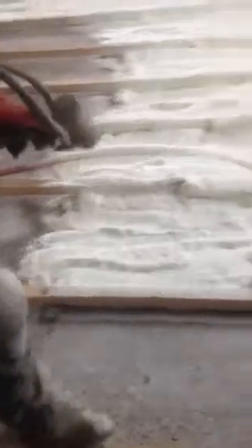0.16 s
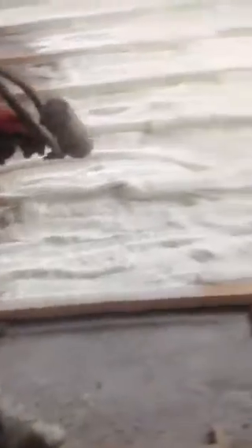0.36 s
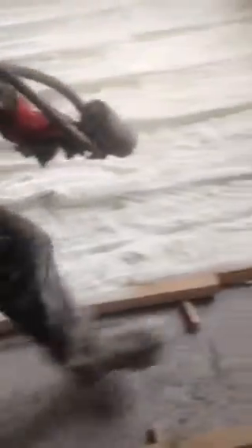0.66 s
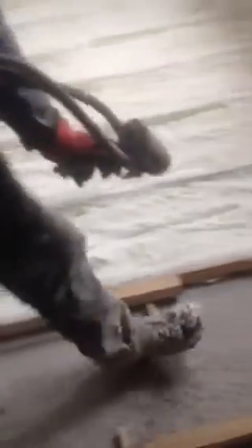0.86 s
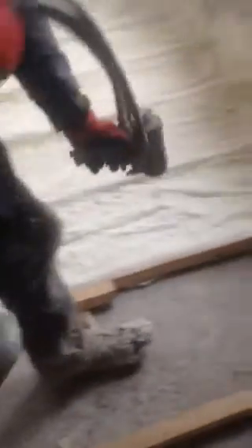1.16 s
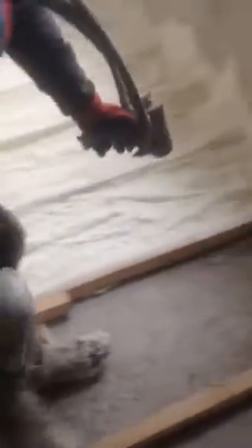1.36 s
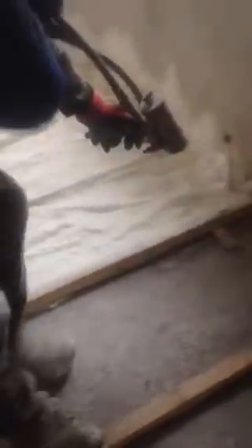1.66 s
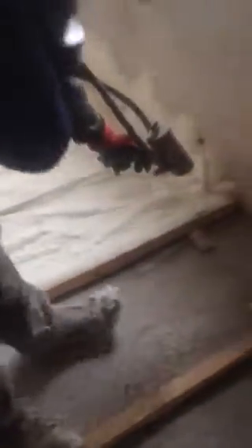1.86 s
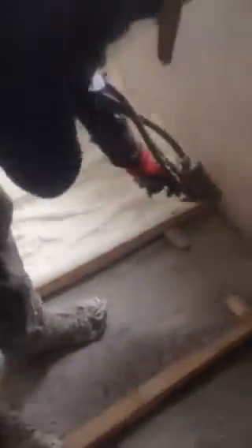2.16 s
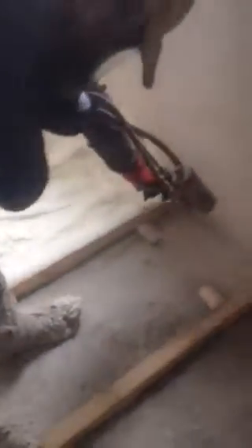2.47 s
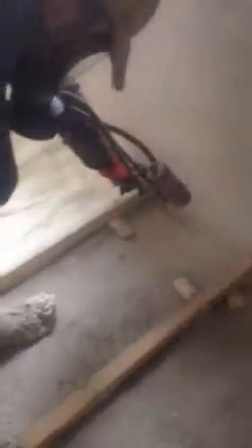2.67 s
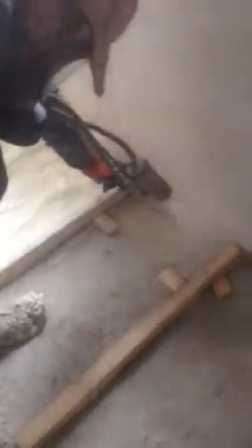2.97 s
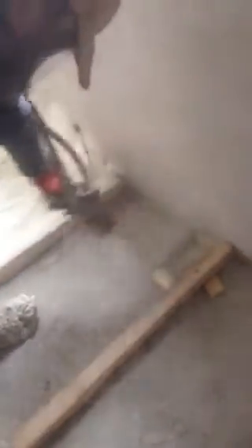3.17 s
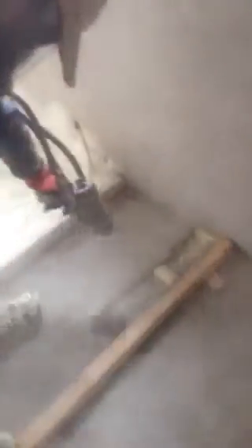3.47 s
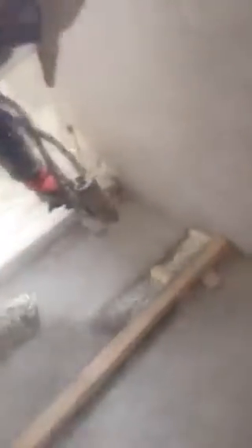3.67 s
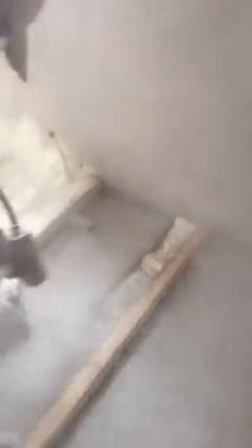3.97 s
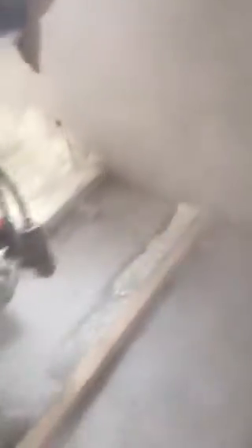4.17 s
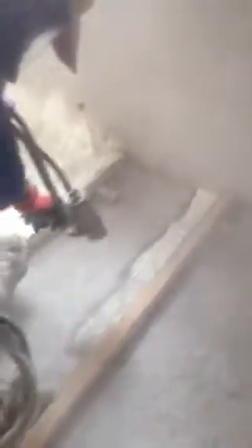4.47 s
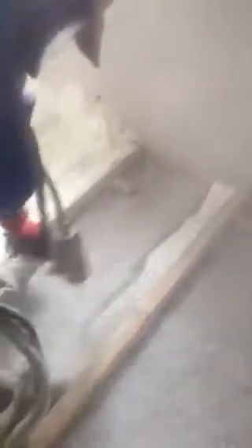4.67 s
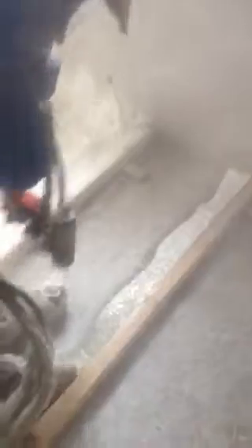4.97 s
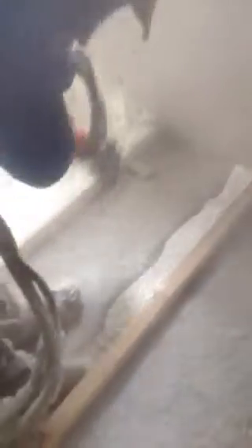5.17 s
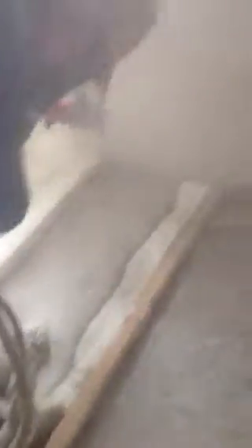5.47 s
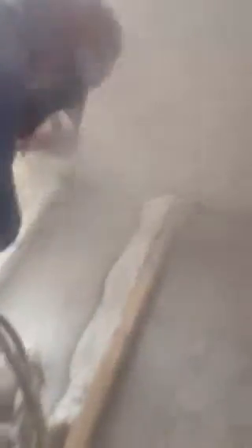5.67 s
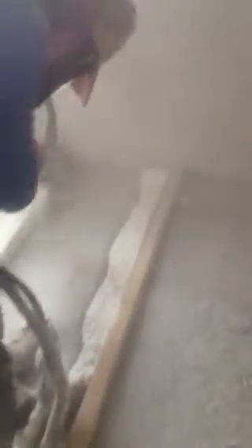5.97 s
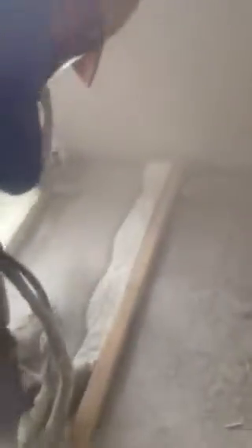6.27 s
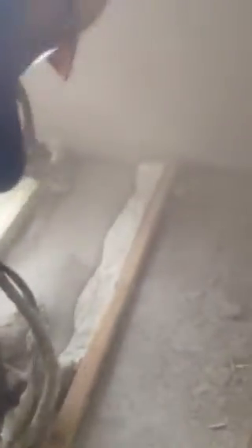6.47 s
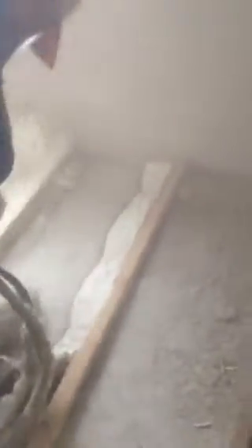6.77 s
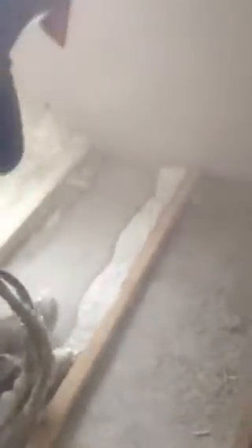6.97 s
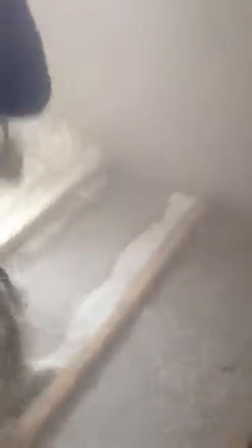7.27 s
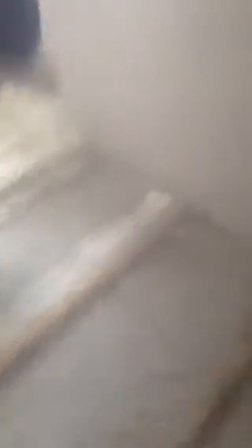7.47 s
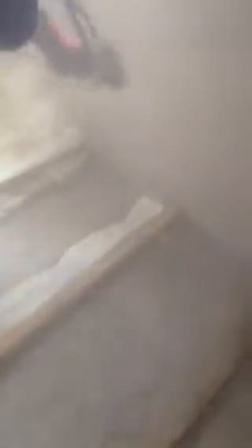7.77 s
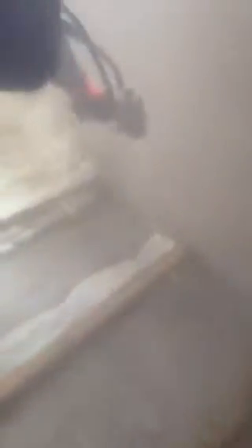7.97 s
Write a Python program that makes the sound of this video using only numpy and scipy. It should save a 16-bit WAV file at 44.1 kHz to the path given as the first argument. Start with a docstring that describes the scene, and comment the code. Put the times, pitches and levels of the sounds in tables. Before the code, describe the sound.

A foam spray gun is already running close to the microphone in a bare concrete room and never stops through about 8 seconds. Its hiss is dense, bright and slightly fluttering, strongest in the high treble, with fine random spatter. A softer midrange wash comes off the floor, and a distant engine drones faintly and low. At 0.85 s a boot shifts with a dull thud and short knock; at 1.9 s another adds a gritty crunch. Faint hollow swells pass from 1.2 s, and a narrow whistly colour wanders through the hiss around 2 to 3 s. At 3.0, 3.8, 4.6, 5.8 and 6.6 s the hiss dulls while a fuller roar rises for about a third of a second and fades, some preceded by tiny surges. The hiss is a little weaker from 5 to 7 s, then returns thinner and fizzier, with a last brief roar at 8 s.

```python
"""Bare concrete room, one mono microphone close to a foam gun spraying insulation between floor battens.
From the start the nozzle hisses and spatters, noise and random droplets shaped by the swing of the gun,
over a steady wash from the floor and the distant throb of the rig's engine, a stack of drifting sines.
At 0.85 s and 1.86 s the worker shifts his boots: noise thuds and grit, with decaying sine knocks.
Bands of noise swell hollowly from 1.2 s; from 3 s the hiss dips and the jet roars on timber and corners."""
import sys
import numpy as np
from scipy import signal
from scipy.fft import rfft, irfft
from scipy.io import wavfile
from scipy.ndimage import uniform_filter1d, map_coordinates

SR = 44100
rng = np.random.default_rng(int(sys.argv[2]) if len(sys.argv) > 2 else 0)


def dump_mix(stems):
    """Bounce the given channels to the path in sys.argv[1] as a 16-bit WAV at rate SR."""
    frames = np.atleast_2d(stems).T  # one column per channel
    limited = np.clip(frames, -1, 1)  # hard clip at full scale
    pcm = np.round(limited * 32767).astype(np.int16)
    wavfile.write(sys.argv[1], SR, pcm)


N = 357640
TIME = np.arange(N) / SR

# distant engine, rumble spectrum: f/Hz, relative density/dB per Hz
ENGINE_RUMBLE = [(20, -42), (45, -12), (75, -24), (100, -8.5), (125, 0.5), (150, -9), (190, 10.5),
                 (280, -10), (400, 3), (900, -19.5)]
# distant engine, orders of its cycle that carry through the walls: multiple of the cycle, level/dB rms
ENGINE_ORDERS = [(10, -64.5), (11, -64.5), (13, -63), (14, -65), (15, -67), (16, -60), (17, -59.5),
                 (18, -69), (19, -60.5), (20, -70), (21, -63), (22, -64), (24, -59.5), (25, -65),
                 (28, -63.5), (29, -73), (36, -63.5), (37, -66.5)]
# boots on the slab, heel then sole: t/s, thud level/dB, knock f/Hz, knock level/dB, grit level/dB
BOOT_STEPS = [(.848, -34.5, 850, -32, -45), (.893, -43, 330, -34, -45), (1.862, -43, 566, -30, -15),
              (1.88, -40, 248, -31, -45)]
# spectrum of a boot's thud: f/Hz, relative density/dB per Hz
BOOT_THUD = [(30, -50), (80, -28), (150, -15), (300, 2), (550, -6.5), (900, -14), (2500, -27)]
# hollow tones and low hums, brief swells: centre t/s, length/s, f/Hz, width/Hz, level/dB
HOLLOW_SWELLS = [(1.2, 0.47, 140, 28, -52), (2.02, .35, 1220, 210, -46), (2.4, 0.51, 955, 45, -50),
                 (2.47, 0.26, 122, 8, -52), (3.147, 0.27, 307, 240, -43.5), (3.963, 0.54, 266, 60, -47.5),
                 (4.8, 0.045, 955, 60, -37), (4.792, 0.034, 630, 260, -32), (4.89, 0.17, 580, 150, -39),
                 (6.043, 0.14, 418, 490, -42), (6.666, 0.089, 1380, 110, -42), (6.883, 0.39, 330, 210, -43)]
# spectrum of the jet striking the floor: f/Hz, relative density/dB per Hz
IMPACT_SPECTRUM = [(30, -66), (90, -14.5), (170, -5.5), (250, 1.5), (340, 0.5), (420, -2), (600, -1),
                   (800, -1.5), (1400, -6.5), (2200, -7.5), (4000, -14.5), (9000, -40)]
# jet catching timber or a corner: t/s, attack/s, length/s, relative level/dB
IMPACT_ROARS = [(2.976, 0.065, 0.31, -37.5), (3.752, 0.06, 0.35, -38.5), (4.59, 0.074, 0.16, -38.5),
                (4.768, 0.015, 0.1, -33), (5.772, 0.14, 0.34, -35.5), (6.613, 0.035, 0.36, -36),
                (8.029, 0.022, 0.04, -32.5)]
# spectrum of the close nozzle: f/Hz, relative density/dB per Hz
NOZZLE_SPECTRUM = [(40, -70), (300, -35.5), (1000, -17.5), (1700, -13.5), (2500, -10), (3200, -8),
                   (3900, -6), (4600, -4), (5200, -6), (6100, -2), (7000, -0.5), (8300, -1), (9600, -4),
                   (11500, -5), (15000, -3.5)]
# slow swing of the gun, nearer and farther, toward and away:
# t/s, relative hiss level/dB, body control/dB, fizz control/dB (both controls weighted by pitch)
GUN_SWING = [(0.14, -22.5, 2, 1), (0.45, -22, 4, 0.7), (0.9, -21, 0.5, 0.1), (1.1, -19, -2, 2),
             (1.5, -19, -1.5, 0), (1.95, -19.5, -2.2, -1.0), (2.4, -20, 0.3, 0.1), (2.85, -20, 1, 0.6),
             (3.5, -20, 1.8, 0.5), (4.2, -21.5, 2, 2.5), (4.5, -21.5, 3.5, 2.3), (5.0, -24, 0.5, 2.5),
             (5.45, -23, 1.5, 2.5), (6.25, -24, 1, 1.7), (6.95, -24, 3, 0.5), (7.18, -22.5, -1, 3),
             (7.45, -21.5, -3.5, 3.5), (8.0, -21, -2.8, 2.5)]
# ringing peak of the plume, moving with the gun's distance from the floor: t/s, f/Hz, lift control/dB
PLUME_PEAK = [(0, 7500, .5), (1.05, 8300, 1), (1.2, 6600, 3), (1.45, 7500, 0.3), (1.75, 8100, 1),
              (2.1, 6500, 5.5), (2.2, 7200, 6), (2.3, 7800, -2), (2.55, 6350, 1), (2.92, 6360, 5),
              (3.4, 7000, -1.5), (3.7, 7060, 3), (4.3, 7900, 1), (6.75, 7200, -1.5), (7.4, 9000, 1)]
# nozzle turned aside or lowered, hiss muffled, before weighting by pitch:
# t/s, length/s, first drop/dB, further sag/dB, recovery/s
NOZZLE_DIPS = [(2.962, 0.22, 5, 3, 0.17), (3.772, 0.23, 1, 7.5, 0.029), (4.04, 0.033, 4, 1.5, 0.01),
               (4.572, 0.2, 0.5, 4, 0.029), (5.777, 0.27, 0.5, 4.5, 0.02), (6.598, 0.28, 2.5, 2.2, 0.03),
               (6.99, 0.22, 1.5, 1.5, 0.1), (8.01, 0.12, 0.5, 3.5, 0.05)]
# share of a dip suffered at each pitch, the treble shaded most: f/Hz, share
DIP_SHADING = [(1500, 0.54), (3500, 0.53), (7000, 0.71), (12000, 1.17)]
# short surges of pressure at the nozzle: centre t/s, length/s, lift/dB
PRESSURE_SPURTS = [(0.38, 0.08, 0.5), (1.05, 0.089, 1.6), (2.93, 0.061, 0), (3.64, 0.073, 1.2),
                   (3.746, 0.06, 2.5), (4.332, 0.063, 0.9), (5.754, 0.06, 1.4), (6.553, 0.12, 1.3),
                   (6.95, 0.07, 0)]


def gain_of(db):
    """Decibels to amplitude."""
    return 10 ** (np.asarray(db) / 20)


def evened(x):
    """Scales to an rms of 1."""
    return x / np.sqrt(np.mean(x ** 2) + 1e-20)


def read(points, hz):
    """Reads a table of levels or shares at the given pitches, along a log frequency axis."""
    f, values = np.transpose(points)
    return np.interp(np.log(hz + 1), np.log(f + 1), values)


def curves(rows, t):
    """Each column of a control table at the times t."""
    s, *columns = np.transpose(rows)
    return [np.interp(t, s, column) for column in columns]


def coloured(x, points):
    """Gives x a spectrum, at rms 1."""
    hz = np.fft.rfftfreq(N, 1 / SR)
    return evened(irfft(rfft(x) * gain_of(read(points, hz)), N))


def ringing(hz, width_hz):
    """Noise in one resonance at rms 1; at 0 Hz, a random drift."""
    f = np.fft.rfftfreq(N, 1 / SR)
    resonance = 1 / (1 + ((f - hz) / width_hz * 2) ** 4)
    return evened(irfft(rfft(rng.standard_normal(N)) * resonance, N))


def reflected(x, paths_ms, strength, sway_ms):
    """Floor, wall and body return the sound over paths that change as the arm swings."""
    out = x.copy()
    for ms in paths_ms:
        delay = (ms + sway_ms * ringing(0, 1.5)) * SR / 1000  # in samples
        out += strength * map_coordinates(x, [np.arange(N) - delay], order=3, mode="wrap")
    return evened(out)


def machine(cycle_hz=12.57, rumble_db=-54, speed_drift=0.001955, fading_db=3.5):
    """A far engine at governed speed; its orders fade and return as the microphone moves in the room."""
    turns = np.cumsum(cycle_hz * (1 + speed_drift * ringing(0, 1.76))) / SR
    out = gain_of(rumble_db) * coloured(rng.standard_normal(N), ENGINE_RUMBLE)
    knots = np.arange(0, TIME[-1] + 1, 0.5)
    for order, db in ENGINE_ORDERS:
        fade = np.interp(TIME, knots, rng.standard_normal(len(knots)))
        tone = np.sqrt(2) * np.sin(2 * np.pi * (order * turns + rng.random()))
        out += gain_of(db + fading_db * fade) * tone
    return out


def boots(rise_s=0.016, room_t60_s=0.63, knock_t60_s=0.045, grit_t60_s=0.02, lowest_hz=170):
    """Each step knocks, crunches a little grit, and its thud dies away in the room."""
    out = np.zeros(N)
    thud = coloured(rng.standard_normal(N), BOOT_THUD)
    grit = coloured(rng.standard_normal(N), NOZZLE_SPECTRUM)
    for s, thud_db, knock_hz, knock_db, grit_db in BOOT_STEPS:
        age = np.maximum(TIME - s, 0)
        fall = -np.log(1000) * age  # divided by a T60, reaches -60 dB at that age
        out += gain_of(thud_db) * thud * (1 - np.exp(-age / rise_s)) * np.exp(fall / room_t60_s)
        out += gain_of(knock_db) * np.sin(2 * np.pi * knock_hz * age) * np.exp(fall / knock_t60_s)
        out += gain_of(grit_db) * grit * (age > 0) * np.exp(fall / grit_t60_s)
    # a solid slab radiates no deep bass
    return signal.sosfilt(signal.butter(3, lowest_hz, "highpass", fs=SR, output="sos"), out)


def hollows():
    """Soft resonances swell and fade, like air blown across a bottle."""
    out = np.zeros(N)
    for s, length, hz, width_hz, db in HOLLOW_SWELLS:
        swell = np.exp(-(2 * (TIME - s) / length) ** 2)
        out += gain_of(db) * ringing(hz, width_hz) * swell
    return out


def roar_level(wash_db=-22.5, release_s=0.21):
    """Relative dB of the roar: a floor wash following the swing, plus swells that rise, hold and die."""
    power = gain_of(curves(GUN_SWING, TIME)[0] + wash_db) ** 2
    for s, attack, length, db in IMPACT_ROARS:
        rise = np.clip((TIME - s) / attack, 0, 1)
        decay = np.exp(-np.maximum(TIME - s - length, 0) / release_s)
        power += (gain_of(db) * rise * decay) ** 2
    return 10 * np.log10(power)


def impact(level_db=-1.5, split_hz=1200, brightening=0.34, buffet_db=0.8):
    """The jet roars where it strikes, brighter the harder it hits."""
    roar_db = roar_level()
    roar = coloured(rng.standard_normal(N), IMPACT_SPECTRUM)
    roar = reflected(roar, paths_ms=[5, 13, 23], strength=0.14, sway_ms=0.45)
    low = signal.sosfiltfilt(signal.butter(2, split_hz, fs=SR, output="sos"), roar)
    high = roar - low
    # brightening: dB of treble per dB of roar above its average
    roar = low + high * gain_of(brightening * (roar_db - roar_db.mean()))
    return roar * gain_of(roar_db + level_db + buffet_db * ringing(0, 56))


def dips(t, onset_s=0.033):
    """Unweighted dB of hiss lost: each dip drops quickly, sags while it lasts, then recovers."""
    lost_db = 0
    for s, length, drop_db, sag_db, recovery in NOZZLE_DIPS:
        depth_db = drop_db + sag_db * np.clip((t - s) / length, 0, 1)
        onset = np.clip((t - s) / onset_s, 0, 1)
        lost_db = lost_db + depth_db * onset * np.clip(1 - (t - s - length) / recovery, 0, 1)
    return lost_db


def spurts(t):
    """dB of hiss gained in the brief surges of pressure."""
    return sum(db * np.exp(-(2 * (t - s) / length) ** 2) for s, length, db in PRESSURE_SPURTS)


def plume_peak(hz, t, width_hz=450):
    """dB by pitch and time: one narrow band stands out of the hiss at the cost of its neighbours."""
    peak_hz, peak_db = curves(PLUME_PEAK, t)
    offset = (hz[:, None] - peak_hz) / width_hz
    return peak_db * (np.exp(-offset ** 2) - 0.27 * np.exp(-(offset / 3.5) ** 2))


def spattering_jet(spatter=0.21, drops_per_s=1500, drop_spread_db=4):
    """Turbulent air as white noise, with droplets bursting as random clicks of uneven size."""
    sizes = gain_of(drop_spread_db * np.minimum(rng.exponential(1, N), 4))
    drops = sizes * (rng.random(N) < drops_per_s / SR)
    return rng.standard_normal(N) + spatter * evened(drops * rng.choice([-1, 1], N))


def nozzle(level_db=2, flutter_db=0.45, flutter_hz=50, patchy_db=1.01):
    """Turbulent air and bursting droplets, louder with the flow and coloured by the aim."""
    jet = coloured(spattering_jet(), NOZZLE_SPECTRUM)
    jet = reflected(jet, paths_ms=[2.3, 5.1, 8.3, 13, 19, 27], strength=0.15, sway_ms=0.3045)
    hz, t, z = signal.stft(jet, SR, nperseg=512, noverlap=384)
    swing_db, body_db, fizz_db = curves(GUN_SWING, t)
    flow = swing_db + spurts(t) - read(DIP_SHADING, hz)[:, None] * dips(t)
    # the highest pitches beam along the jet, the lower ones spread sideways
    body = read([(4200, 0.41), (6300, 0.11)], hz)[:, None] * body_db
    fizz = read([(8000, -0.53), (10200, 0.56)], hz)[:, None] * fizz_db
    # eddies in the plume lift patches of the hiss for a moment
    eddies = uniform_filter1d(rng.standard_normal(z.shape), size=7, axis=0)
    eddies = evened(uniform_filter1d(eddies, size=24, axis=1))
    shape_db = flow + body + fizz + plume_peak(hz, t) + patchy_db * eddies
    jet = signal.istft(z * gain_of(shape_db), SR, nperseg=512, noverlap=384)[1][:N]
    return jet * gain_of(level_db + flutter_db * ringing(0, flutter_hz))


def scene():
    """All sources reach one microphone, the same in both channels."""
    mono = machine() + boots() + hollows() + impact() + nozzle()
    return np.array([mono, mono])


def record(dry, edge_hz=15270):
    """The recorder's steep band limit: a long low-pass filter."""
    band_limit = signal.firwin(1023, edge_hz, window=("kaiser", 9), fs=SR)
    return signal.oaconvolve(dry, band_limit[None], "same")


dry = scene()
out = record(dry)
dump_mix(out)
```